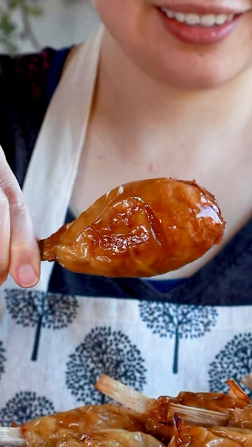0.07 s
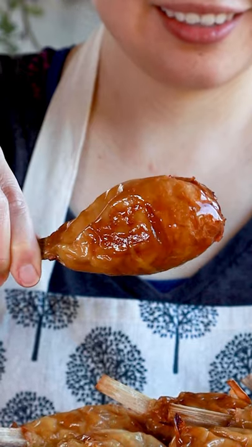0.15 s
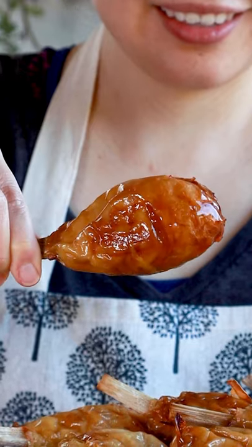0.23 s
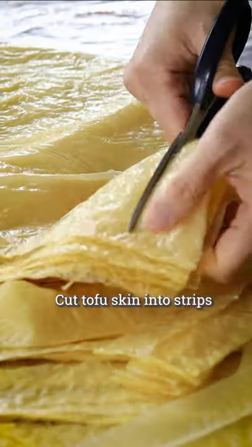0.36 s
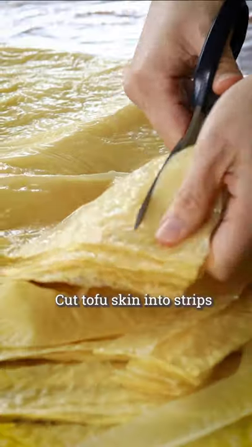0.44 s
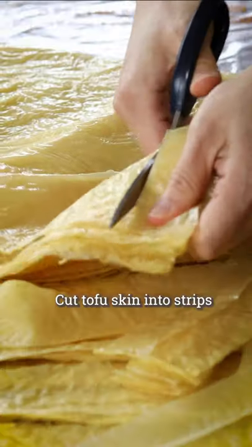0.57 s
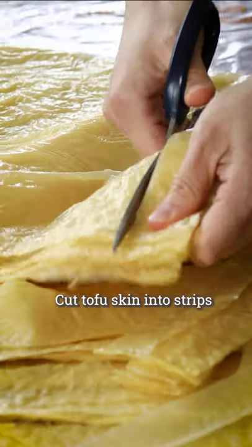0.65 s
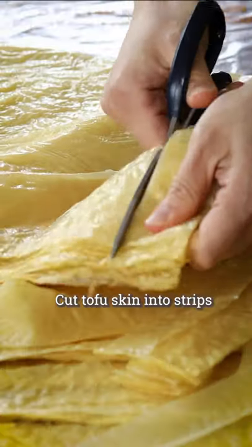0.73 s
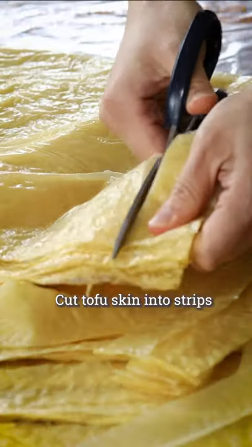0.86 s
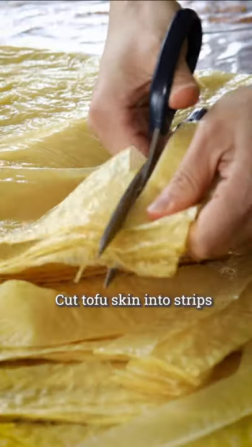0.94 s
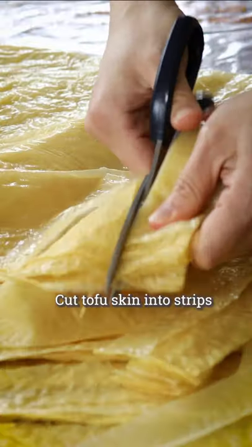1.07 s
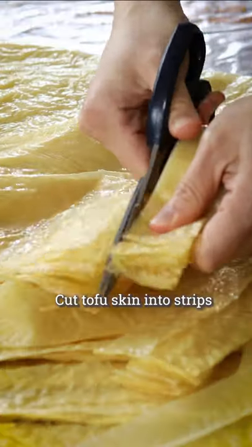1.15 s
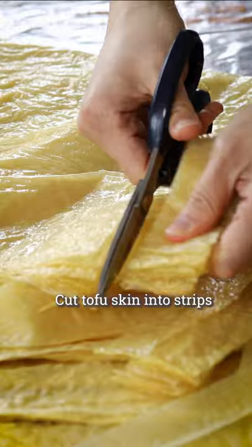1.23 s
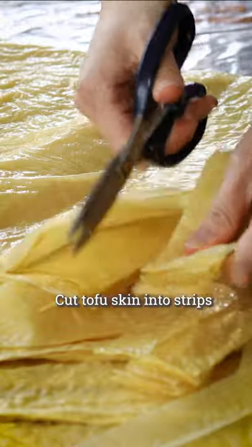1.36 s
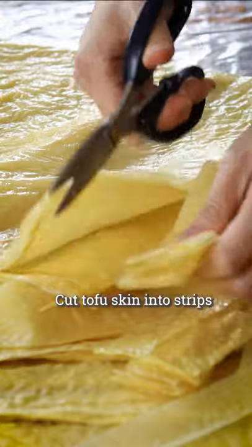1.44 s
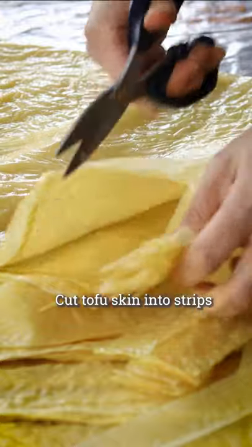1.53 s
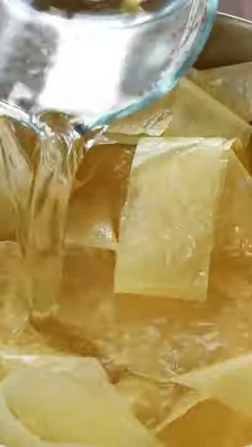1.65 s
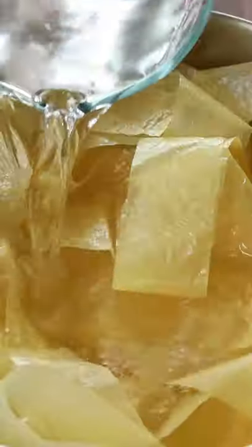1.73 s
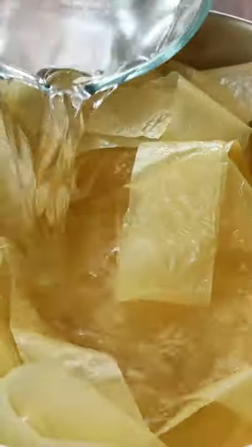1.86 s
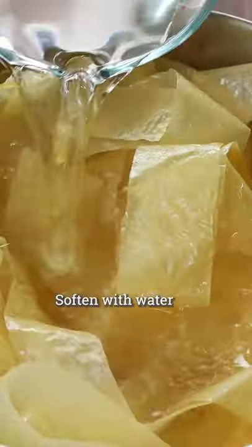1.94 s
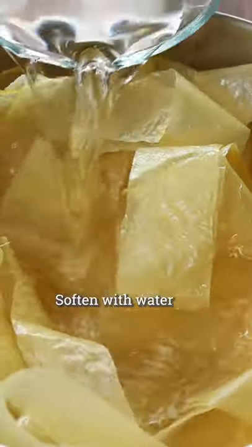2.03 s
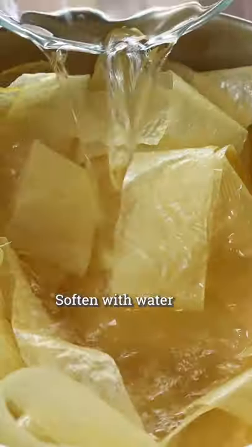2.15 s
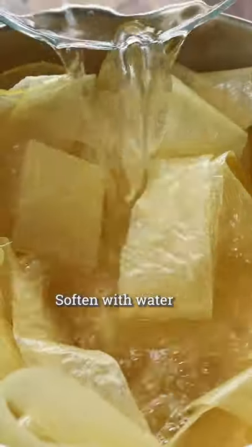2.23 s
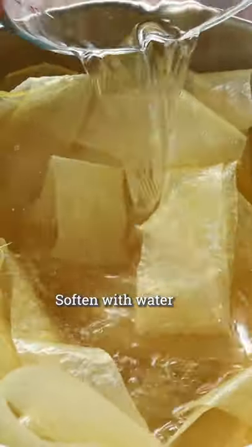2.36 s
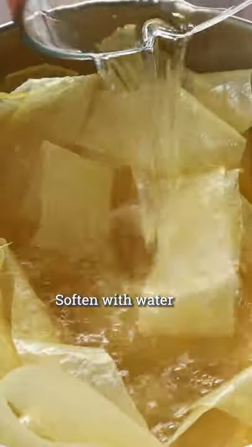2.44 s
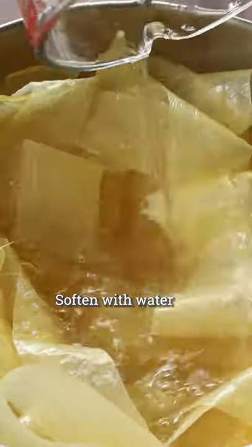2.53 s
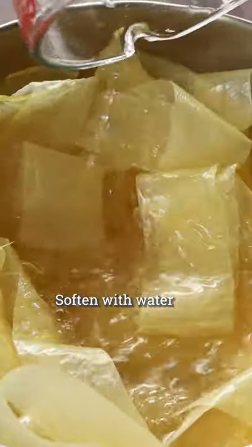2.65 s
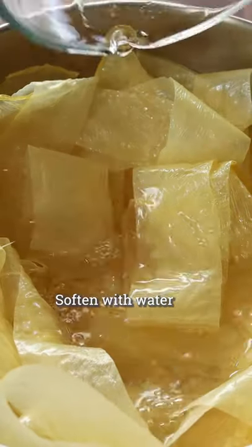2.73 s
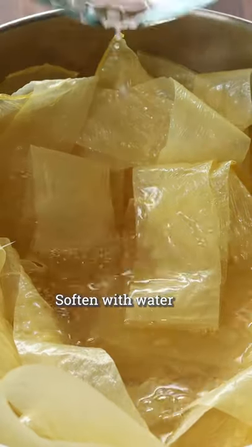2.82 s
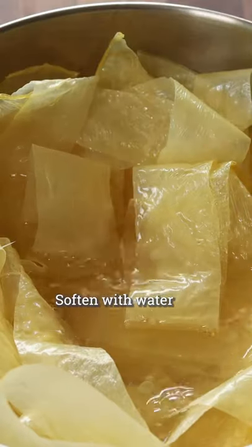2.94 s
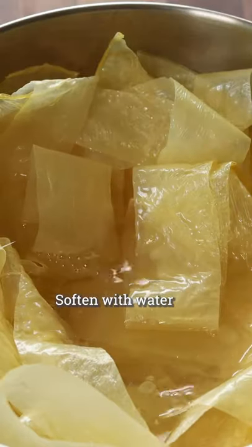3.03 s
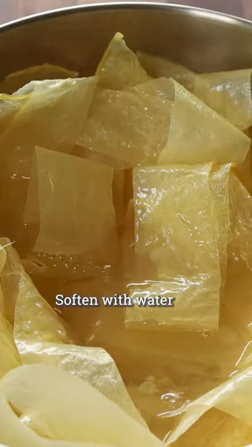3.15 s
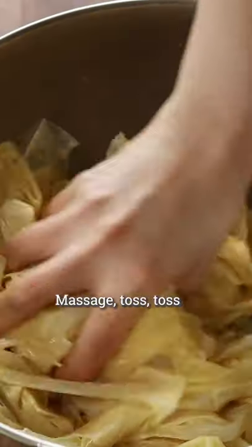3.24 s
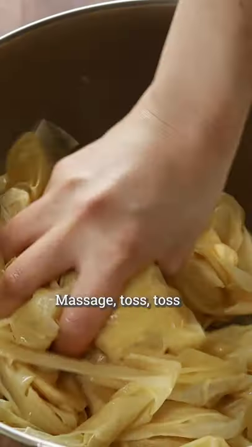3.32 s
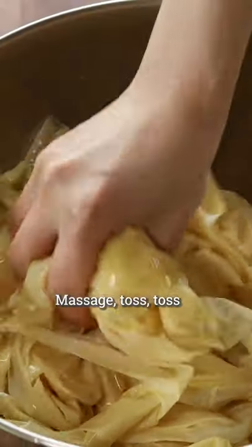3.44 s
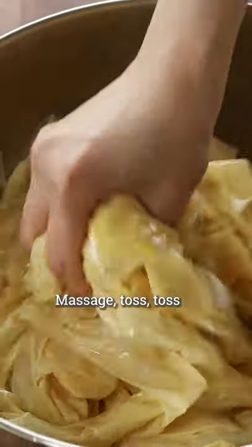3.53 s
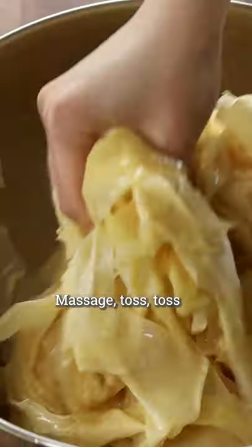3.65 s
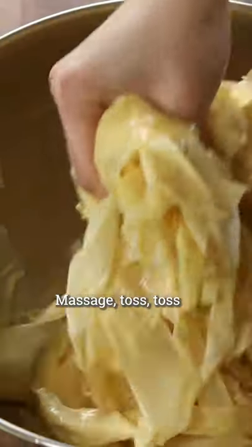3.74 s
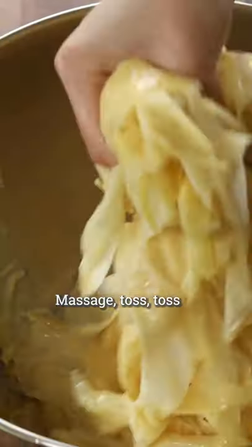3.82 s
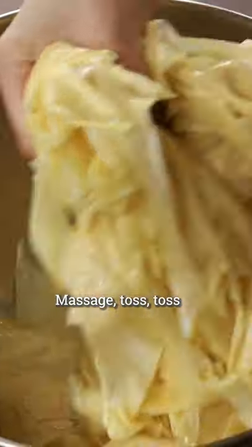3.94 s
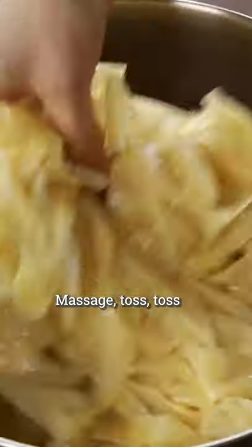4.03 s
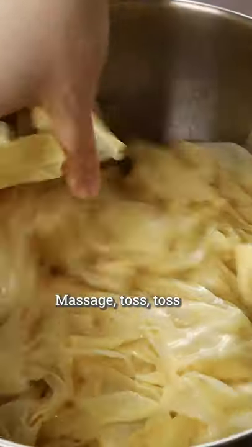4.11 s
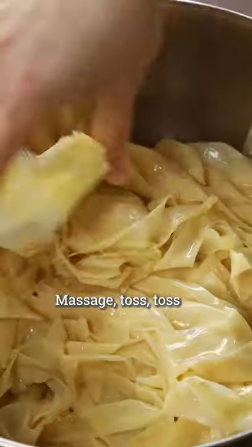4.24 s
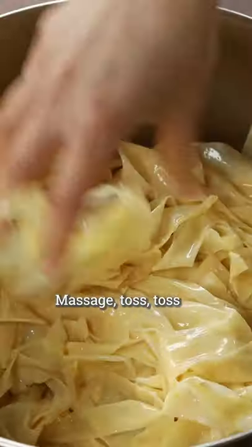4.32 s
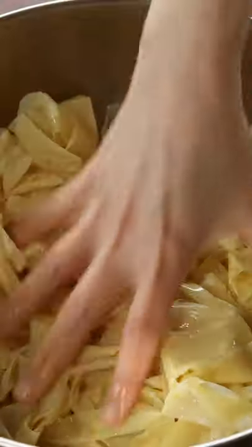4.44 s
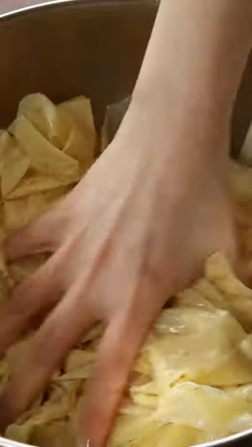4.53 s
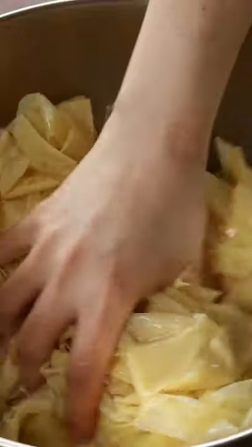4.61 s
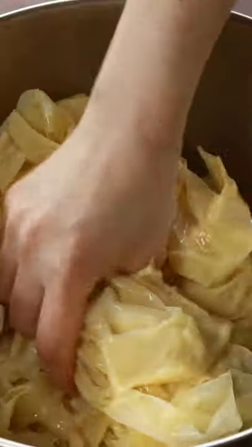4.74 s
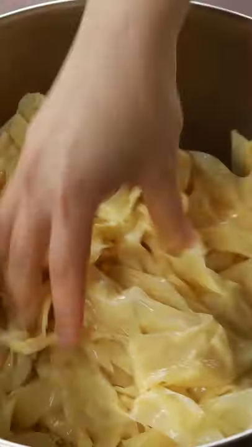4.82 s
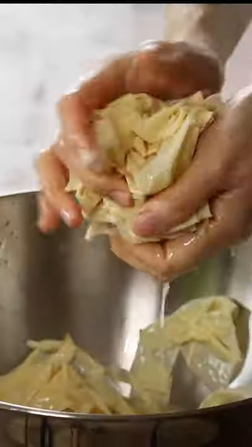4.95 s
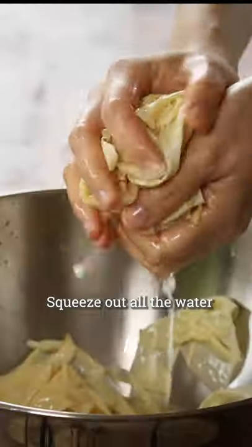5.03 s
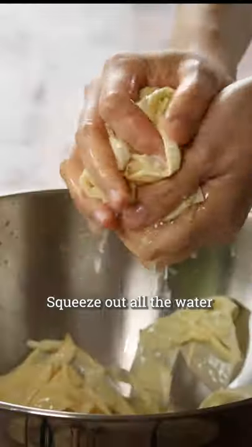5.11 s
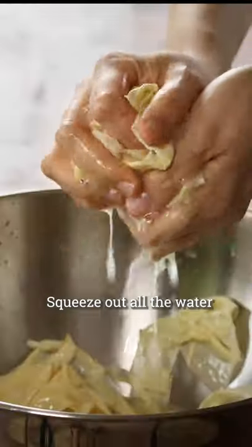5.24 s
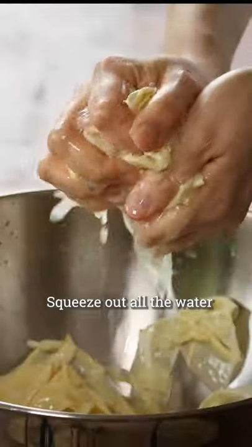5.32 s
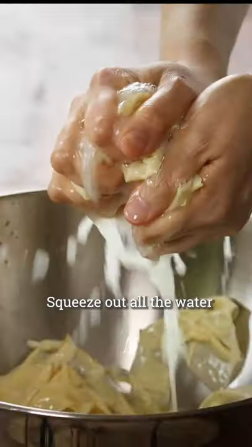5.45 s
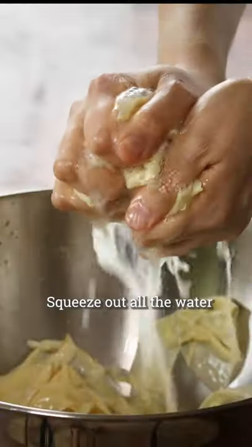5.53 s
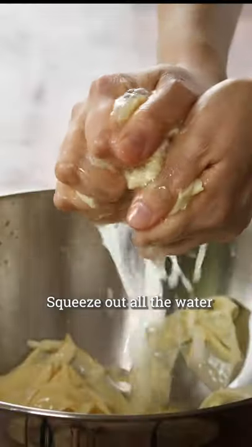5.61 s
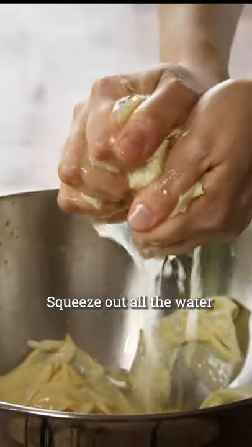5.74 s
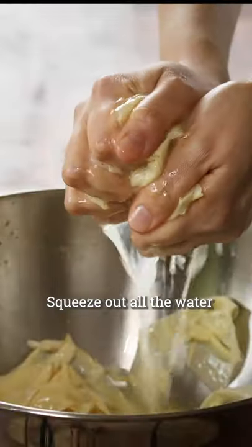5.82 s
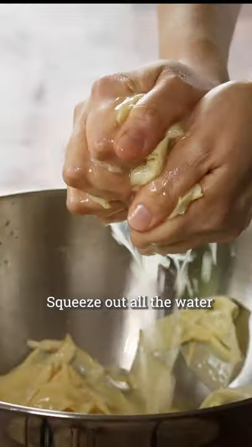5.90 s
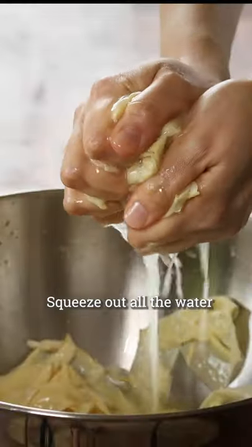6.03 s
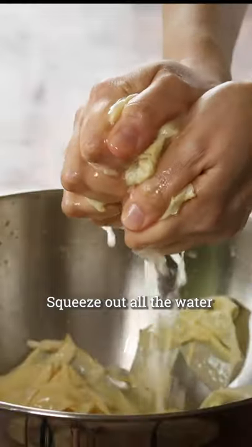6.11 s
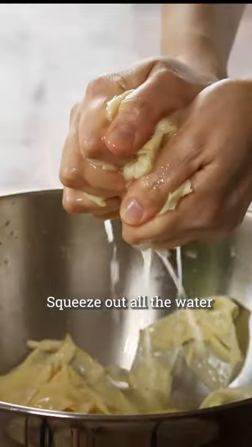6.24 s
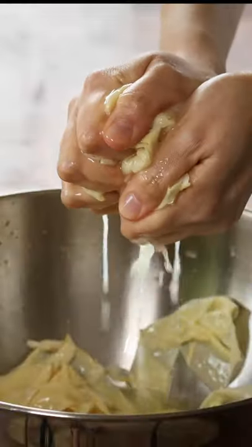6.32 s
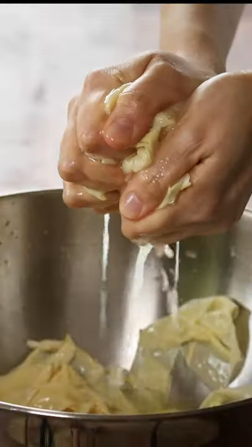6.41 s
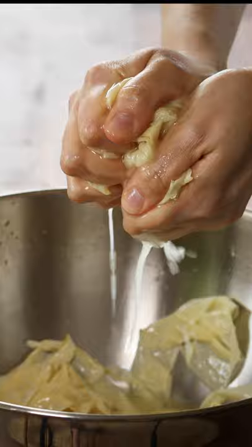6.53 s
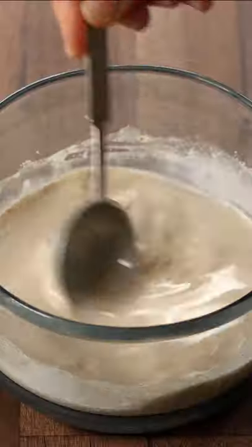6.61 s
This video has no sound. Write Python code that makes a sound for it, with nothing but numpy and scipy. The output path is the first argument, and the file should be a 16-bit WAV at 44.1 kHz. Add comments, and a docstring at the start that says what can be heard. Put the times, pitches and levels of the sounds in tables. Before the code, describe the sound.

Scissors crunch through brittle tofu skin and snap shut, water pours bubbling into a steel bowl, wet strips squelch, then get wrung out in spattering streams.

```python
"""A kitchen in five parts, each with its own background: first low noise, a faint twitter and hiss.
Scissors then crunch through tofu skin (swarms of tiny cracks and ticks) and snap shut (ringing steel).
Water is poured over the strips in a steel bowl (rising sine bubbles over hiss), leaving froth.
A hand tosses the wet strips twice (squelch, squeak and air pops). After a moment of silence two hands
wring them out: water streams, spatters, fizzes and drips. Fan tones hum from the cutting onwards."""
import sys
import numpy as np
from scipy import signal
from scipy.fft import rfft, irfft, next_fast_len
from scipy.io import wavfile

SR = 44100
rng = np.random.default_rng(int(sys.argv[2]) if len(sys.argv) > 2 else 0)


def unload_wav(signal):
    """Save mono or channel-first audio to the path in sys.argv[1] as 16-bit WAV at rate SR, clipped to [-1, 1]."""
    wavfile.write(
        sys.argv[1],
        SR,
        np.round(np.clip(np.atleast_2d(signal).T, -1, 1) * 32767).astype(np.int16),
    )


N = 294147
TIME = np.arange(N) / SR

# background of each part: (start [s], end [s], rumble level [dB], hiss level [dB], low cut [Hz])
PARTS = [(0, 0.385, -59.5, -64, 18), (0.384, 1.717, -50, -55, 46), (1.71, 3.26, -51, -56, 85),
         (3.26, 4.766, -51.5, -52, 75), (4.972, 6.68, -53.5, -53, 86)]
# the blades slam shut, and a close reflection follows about 9 ms later: (time [s], strength [dB])
SNAP_AND_REFLECTION = [(1.2207, 2.5), (1.2297, -10)]


def cutting():
    """Tofu skin cracks at each bite of the blades, which tick as they rub; one more tick follows the snap."""
    # the blades bite into the sheets: (start [s], length [s], level [dB], treble relative to it [dB])
    bites = [(.505, .018, -56.5, 2.5), (.575, .02, -54, -5), (.636, .06, -50.5, -9), (.783, .016, -53, 2.5),
             (.808, 0.01, -48.5, -7.5), (.99, .07, -54, -7), (1.07, 0.0077, -48.5, -12.5),
             (1.176, .042, -45, -1)]
    # colour of the crunch: (frequency [Hz], relative level per Hz [dB])
    shear_colour = [(240, -38.5), (400, 0), (852, -4.5), (1270, -0.5), (1580, -6), (1930, -4), (3580, -13),
                    (12100, -31), (16000, -25.5)]
    # ticks of the blades, the last one well after the snap: (time [s], peak [dB], centre [Hz], width [octaves])
    tick_table = [(0.5094, -32.5, 7000, 2.1), (0.588, -31, 7030, 1.2), (0.63, -33, 2510, 1.6),
                  (0.6744, -35.5, 2390, 1.9), (0.8096, -27.5, 6200, 2.1), (.814, -21, 7560, 1.5),
                  (.983, -38, 3950, 2.3), (1.0718, -28.5, 2200, 0.48), (1.071, -28, 7000, 1.4),
                  (1.0785, -18.5, 2117, 0.56), (1.08, -32, 6500, 1.5), (1.173, -27, 6880, 2.6),
                  (1.185, -30, 7000, 2.7), (1.647, -22.5, 6760, 1.1)]
    span = (PARTS[1][0], SNAP_AND_REFLECTION[0][0])
    body, treble = strokes(bites, attack_s=0.0053, release_db_per_s=172.5)
    crunch = swarm(span, body, treble, shear_colour, count=1400, cycles=11, rise=0,
                   spread_db=0.5, pan_db=4.0, hiss_db=-2)
    ticks = np.zeros((2, N))
    age = np.arange(600) / SR
    for s, db, hz, octaves in tick_table:
        # one click and a short burst of noise
        noise = rng.standard_normal((2, len(age))) * from_db(-60 * age / 0.0078)
        slip = (age == 0) + 0.46 * noise
        half_width = 2 ** (octaves / 2)
        crack = band(slip, [hz / half_width, hz * half_width], "band")
        add(ticks, s, from_db(db) * crack / np.abs(crack).max())
    return kitchen(crunch + ticks, wet_db=-12, early_db=-6.0)


def snap():
    """The closing blades hit their stop: a crack and a brief ring up close, then the room answers."""
    # ringing tones of the scissors: (frequency [Hz], level [dB], time to fall 60 dB [s])
    scissors_modes = [(820, -40, .04), (1430, -23, 0.039), (1963, -16, 0.013), (2170, -14, 0.028),
                      (2700, -20.5, 0.014), (3560, -19, 0.046), (4300, -11.5, 0.0041), (4640, -9.5, 0.012),
                      (5810, -7, 0.0085), (7300, -12, .006), (8830, -5.5, 0.0058), (14360, -13.5, 0.0053)]
    # the snap as it spreads into the room: (frequency [Hz], relative level per Hz [dB])
    snap_colour = [(150, -28.5), (350, -23), (452, -15.5), (754, -6), (990, -15), (1910, 0), (2350, -7.5),
                   (2710, -3.5), (3080, -8.5), (5750, -3), (7670, -11.5), (9000, -7), (11600, -19),
                   (14100, -9), (16000, -35.5)]
    direct = np.zeros((2, N))
    blows = np.zeros((2, N))
    age = np.arange(int(.1 * SR)) / SR
    ring = 0
    for k, (hz, db, t60) in enumerate(scissors_modes):
        sign = (-1) ** k   # neighbouring tones start in opposite directions
        ring = ring + sign * from_db(db - 60 * age / t60) * np.sin(2 * np.pi * hz * age)
    for s, db in SNAP_AND_REFLECTION:
        crack = stereo_noise(-1, size=len(age)) * from_db(-7 - 60 * age / 0.0053)
        add(direct, s, from_db(db) * band(ring + crack, 890, "high"))
        add(blows, s, from_db([db]))
    spreading = coloured(blows, snap_colour)
    reflections = kitchen(spreading, wet_db=-2.5, early_db=0.0) - spreading
    return direct + from_db(15) * reflections


def pouring():
    """The stream drives air into the water: loud bubbles with surges of fizz, middling ones, and slaps."""
    # flow of the pour: (time [s], level [dB])
    pour_flow = [(1.71, -66), (1.726, -43), (1.82, -53), (1.95, -43.5), (2.3, -42), (2.53, -41),
                 (2.65, -46), (2.74, -63), (2.83, -62)]
    # the loudest bubbles, low and high in pitch: (time [s], height [dB], pitch [Hz], ring [cycles])
    loud_table = [(1.7286, -21, 2070, 8.6), (1.7556, -31, 2740, 35), (1.8371, -19, 5770, 14),
                  (1.9606, -23, 2040, 28), (2.0125, -20, 4340, 16), (2.0489, -16.5, 1500, 9.4),
                  (2.1276, -26, 1980, 39), (2.197, -18.5, 3870, 23), (2.2356, -22.5, 5570, 51),
                  (2.2795, -18, 3500, 40), (2.3112, -27, 2160, 36), (2.3885, -14, 3060, 18),
                  (2.423, -21, 8050, 37), (2.4871, -19, 1950, 39), (2.5795, -17.5, 7700, 23),
                  (2.6079, -27, 1590, 56), (2.622, -23, 2840, 33)]
    # the stream slaps onto a floating strip: (start [s], length [s], level [dB], treble relative to it [dB])
    slaps = [(1.75, .015, -43, -4.5), (1.839, 0.057, -50, 7), (2.697, 0.011, -48, 3.5)]
    # colour of the fizz: (frequency [Hz], relative level per Hz [dB])
    pour_colour = [(290, -39), (500, -13), (893, -18), (1180, -8), (1360, -9), (1900, -3.5), (2260, -2.5),
                   (2980, -3.5), (4800, -10), (8090, -17), (10100, -21.5), (14500, -20), (16000, -28)]
    span, flow = flow_curve(pour_flow)
    s, db, hz, cycles = np.transpose(loud_table)
    gulps = from_db(1.67 * drift(34.88))   # the stream gulps unevenly
    # each of the loudest bubbles comes with a surge of fizz
    body = flow * surges(s, db=4, decay_s=0.011) * gulps
    treble = body * from_db(-4 + 2.5 * drift(70))   # the treble flickers
    slap_body, slap_treble = strokes(slaps, attack_s=0.0044, release_db_per_s=352)
    fizz = swarm(span, np.maximum(body, slap_body), np.maximum(treble, slap_treble), pour_colour,
                 count=3400, cycles=34, rise=0.13, spread_db=4.0, pan_db=2.0, hiss_db=-9.5)
    loud = bubbles(s, from_db(db), hz, cycles, rise=0.089, pan_db=6.0, swell_cycles=0.58)
    # bubbles of middling pitch, born at random
    middling = scattered(span, (1555, 4200), count=36, cycles=64, spread_db=2)
    middling = flow * from_db(10.5) * middling
    return kitchen(fizz + loud + middling + froth(), wet_db=-14.5, early_db=-6.0)


def froth():
    """The froth left by the pour crackles and hisses for a moment and fades."""
    span = (2.6, 3.26)   # s
    gain = from_db(-61) * swell(span[0], 0.54, .05, 48)
    hiss = rms_one(band(stereo_noise(3), [4500, 14000], "band")) * during(*span)
    bursts = crackle(span, (5200, 14000), count=700, cycles=15, spread_db=8)
    return gain * (bursts + from_db(-5) * hiss)


def tossing():
    """Wet strips slide, squelch and squeak, then pockets of air pop; the same toss comes twice."""
    # the hand presses, then grips: (start [s], length [s], level [dB], treble relative to it [dB])
    squeezes = [(3.29, 0.1, -48.5, -18), (3.55, 0.017, -50, -16)]
    # colour of the squelch: (frequency [Hz], relative level per Hz [dB])
    toss_colour = [(300, -3.5), (430, -7.5), (560, 3.5), (780, -2), (1050, -1.5), (1600, -6), (2200, -6),
                   (3700, -12), (5000, -16.5), (14000, -25)]
    # pockets of air escaping: (time [s], height before filtering [dB], pitch [Hz], ring [cycles])
    pop_table = [(3.9264, -13, 3630, 13.8), (3.9328, -23.5, 3490, 11), (3.979, -37, 1050, 18),
                 (3.986, -34, 960, 15), (3.994, -38, 1010, 13), (4.005, -38, 890, 14)]
    span, again_s = (3.26, 3.97), .7507
    body, treble = strokes(squeezes, attack_s=0.044, release_db_per_s=37)
    squelch = swarm(span, body, treble, toss_colour, count=1300, cycles=12, rise=0.057,
                    spread_db=5.0, pan_db=1.0, hiss_db=3.5)
    # wet strips part from each other with tiny smacks
    smacks = crackle(span, (9000, 15500), count=160, cycles=14, spread_db=6)
    smacks = body * from_db(-16.5) * smacks
    # air whistles out between the fingers, at a wavering level
    whistle = rms_one(band(stereo_noise(-6), (10600, 11400), "band"))
    squeak = from_db(-67 + 3.4 * drift(90)) * swell(3.62, 0.044, .01, 300) * whistle
    pops = 0
    for s, db, hz, cycles in pop_table:
        pop = bubbles(np.array([s]), from_db([db]), np.array([hz]), cycles, rise=.02, swell_cycles=0.14)
        # a small pocket radiates little bass
        pops = pops + band(band(pop, 0.59 * hz, "high"), 0.61 * hz, "high")
    toss = kitchen(squelch + smacks + squeak + pops, wet_db=-13.5, early_db=-7.0)
    return toss + delayed(toss, again_s)


def wringing():
    """Thin jets spatter on steel and wet strips, brighter as they thin out; single drops fall as well."""
    # flow of the wrung-out water: (time [s], level [dB])
    wring_flow = [(4.972, -78), (5.09, -62), (5.23, -44.5), (5.33, -40.5), (5.53, -39), (5.6, -43.5),
                  (5.95, -47.5), (6.2, -55.5), (6.5, -66), (6.67, -62.5)]
    # drops falling from the hands: (time [s], height [dB], pitch [Hz])
    drop_table = [(5.4178, -19.5, 5700), (5.53, -20.5, 2626), (5.667, -23.5, 4200), (5.8388, -20, 7300),
                  (5.9597, -27.5, 1882), (5.9704, -20.5, 2690), (6.111, -27.5, 2190), (6.2918, -37, 3977),
                  (6.351, -34.5, 6900), (6.5026, -30, 7760), (6.5206, -30, 11210), (6.59, -29, 4270),
                  (6.6084, -34, 4300), (6.6288, -33.5, 1510), (6.635, -33, 980)]
    # colour of the spatter: (frequency [Hz], relative level per Hz [dB])
    wring_colour = [(400, -16), (600, -9.5), (900, -14.5), (1250, -9.5), (1900, -4.5), (2700, -3),
                    (3700, -4.5), (5500, -6), (7500, -7), (10000, -13.5), (16000, -19)]
    thinning_from_s, thinning_db_per_s = 5.19, 11.5
    span, flow = flow_curve(wring_flow)
    treble = from_db(-11.5 + thinning_db_per_s * np.maximum(TIME - thinning_from_s, 0))
    s, db, hz = np.transpose(drop_table)
    body = flow * surges(s, db=1.5, decay_s=0.017)   # each drop throws up some more spatter
    spatter = swarm(span, body, body * treble, wring_colour, count=5400, cycles=23, rise=0.11,
                    spread_db=3.0, pan_db=5.5, hiss_db=-6.5)
    drops = bubbles(s, from_db(db), hz, cycles=24.5, rise=0.12, pan_db=2.0, swell_cycles=0.27)
    return kitchen(spatter + foam(span, count=1300) + drops, wet_db=-13.5, early_db=-2.5)


def foam(span, count):
    """Tiny bubbles burst with very high, long rings, patch by patch."""
    # patches of foam on the wrung-out water: (start [s], length [s], level [dB])
    foam_patches = [(5.41, 0.029, -50), (5.65, 0.013, -47), (6.347, 0.2, -57)]
    start, end = span
    patches = [from_db(db) * swell(s, length, attack_s=0.042, release_db_per_s=94)
               for s, length, db in foam_patches]
    gain = np.max(patches, axis=0)
    when, pitch, luck = rng.random((count, 3)).T
    hz = 10500 + 5000 * pitch
    fizz = bubbles(start + when * (end - start), from_db(15 * luck), hz, cycles=150, rise=.02, pan_db=9)
    return rms_one(fizz) * np.sqrt(during(start, end).mean()) * gain


def twitter():
    """A faint, fluttering narrow band of noise in the first part."""
    tone = rms_one(band(rng.standard_normal(N), [3200, 3750], "band"))
    return tone * during(*PARTS[0][:2]) * from_db(-70.5 + 2 * drift(84))


def background():
    """Fan rumble, wavering fan tones and hiss, different in each part, over the microphones' own hiss."""
    # colour of the rumble: (frequency [Hz], relative level per Hz [dB])
    rumble_colour = [(20, -13.5), (40, 1), (70, 9.5), (135, 4), (195, 6.5), (240, 2), (310, -1), (400, -6),
                     (600, -14.5), (800, -20), (1300, -74.5)]
    # colour of the hiss: (frequency [Hz], relative level per Hz [dB])
    hiss_colour = [(250, 1), (500, 0), (1000, -3.5), (2000, -8.5), (4000, -15), (9000, -20), (16000, -26.5)]
    # fan tones: (start [s], end [s], middle pitch [Hz], middle level [dB])
    fan_tones = [(0.39, 1.709, 361.3, -61), (1.736, 3.254, 147, -55), (1.71, 3.25, 285.8, -60),
                 (3.26, 4.758, 132.5, -55), (3.258, 4.759, 264.4, -58), (4.965, 6.68, 142.4, -61.5),
                 (4.985, 6.68, 287.7, -61)]
    rumble = coloured(stereo_noise(-.5), rumble_colour)
    hiss = rms_one(coloured(stereo_noise(-2.5), hiss_colour))
    out = from_db(-70.5) * rms_one(band(stereo_noise(-14.5), 11000, "low"))   # microphone hiss
    for start, end, rumble_db, hiss_db, cut_hz in PARTS:
        part_rumble = from_db(rumble_db) * rms_one(band(rumble, cut_hz, "high"))
        out = out + during(start, end) * (part_rumble + from_db(hiss_db) * hiss)
    for start, end, hz, db in fan_tones:
        phase = 2 * np.pi * np.cumsum(hz * (1 + 0.01205 * drift(16))) / SR
        level = from_db(db + 1.9 * drift(14))
        out = out + during(start, end) * level * np.sqrt(2) * np.sin(phase)
    return out


def kitchen(x, wet_db, early_db):
    """Close reflections from bowl and worktop, then a diffuse tail that fades at its own rate in each band."""
    # the kitchen's ring: (frequency [Hz], time to fall 60 dB [s])
    room_t60 = [(200, 0.26), (800, 0.67), (2000, 0.58), (5500, 0.69), (9000, 0.3), (15000, 0.78)]
    count = int(.7 * SR)
    age = np.arange(count) / SR
    edges = np.geomspace(150, 19000, 8)
    tail = 0
    for low, high in zip(edges, edges[1:]):
        noise = band(stereo_noise(0, size=count), [low, high], "band")
        tail = tail + noise * from_db(-60 * age / at_hz(room_t60, np.sqrt(low * high)))
    tail = tail + 2 * band(tail, 9000, "low")
    tail = tail * np.clip(age / 0.012, 0, 1) * (age > .004)
    early = band(stereo_noise(0, size=count), [300, 13000], "band")
    early = early * from_db(-60 * age / 0.13) * (age > .0015)
    response = from_db(wet_db) * rms_one(tail) + from_db(early_db) * rms_one(early)
    return x + signal.fftconvolve(x, response / np.sqrt(count), axes=1)[:, :N]


def bubbles(s, size, hz, cycles, rise, pan_db=0, swell_cycles=0.61):
    """Each bubble is a sine that swells quickly, dies over some cycles and rises in pitch near the surface."""
    age = np.arange(1300) / SR
    turns = hz[:, None] * age
    # 1 when the ring has fallen by 60 dB
    spent = np.minimum(turns / np.reshape(cycles, (-1, 1)), 2)
    height = size[:, None] * (1 - np.exp(-(turns / swell_cycles) ** 2)) * from_db(-60 * spent)
    waves = height * np.sin(2 * np.pi * turns * (1 + rise * spent / 2))
    where = np.round((s[:, None] + age) * SR).astype(int).ravel()
    pan = pan_db * rng.standard_normal((len(s), 1))
    sides = [np.bincount(where, (waves * from_db(way * pan / 2)).ravel(), N)[:N] for way in (1, -1)]
    return np.array(sides)


def swarm(span, body_gain, treble_gain, colour, count, cycles, rise, spread_db, pan_db, hiss_db):
    """Many small bubbles or cracks over a fine hiss, with one envelope for the body and one for the treble."""
    start, end = span
    when, pitch, luck, sign = rng.random((count, 4)).T
    # spread evenly in the square root of the pitch, 400 to 15500 Hz
    hz = (np.sqrt(400) + pitch * (np.sqrt(15500) - np.sqrt(400))) ** 2
    size = from_db(spread_db * np.minimum(-np.log(luck), 3.5)) * np.sign(sign - .5)
    smallness = np.sqrt(hz / 3000)   # small bubbles ring for more cycles; the height evens out their energy
    live = during(start, end)
    times = start + when * (end - start)
    grains = bubbles(times, size * smallness, hz, cycles * smallness, rise, pan_db)
    hiss = rms_one(stereo_noise(-5.1) * live)
    sound = coloured(rms_one(grains) + from_db(hiss_db) * hiss, colour)
    body = band(band(sound, 5500, "low"), 5500, "low")
    treble = band(band(sound, 5500, "high"), 5500, "high")
    mix = rms_one(body) * body_gain + rms_one(treble) * treble_gain
    return mix * np.sqrt(live.mean()) * live   # levels count over the span only


def scattered(span, hz_range, count, cycles, spread_db):
    """Single bubbles at random moments, spread evenly in log pitch, of height about 1."""
    when, pitch = rng.random((count, 2)).T
    low, high = hz_range
    size = from_db(spread_db * np.clip(rng.standard_normal(count), -2, 2))
    times = span[0] + when * (span[1] - span[0])
    return bubbles(times, size, low * (high / low) ** pitch, cycles, rise=.1, pan_db=0.5)


def crackle(span, hz_range, count, cycles, spread_db):
    """Scattered tiny bursts, rms about 1 while they last."""
    bursts = scattered(span, hz_range, count=count, cycles=cycles, spread_db=spread_db)
    return rms_one(bursts) * np.sqrt(during(*span).mean())


def flow_curve(points):
    """Start and end of a flow, and its gain at every moment."""
    flow_s, flow_db = np.transpose(points)
    return (flow_s[0], flow_s[-1]), from_db(np.interp(TIME, flow_s, flow_db))


def swell(start, length, attack_s, release_db_per_s):
    """Attack up to the start, hold, then a steady fall in dB."""
    attack = np.clip((TIME - start) / attack_s + 1, 0, 1)
    return attack * from_db(-release_db_per_s * np.maximum(TIME - start - length, 0))


def strokes(rows, attack_s, release_db_per_s):
    """Gains of body and treble for a run of strokes that share one envelope."""
    body = treble = 0
    for start, length, db, treble_db in rows:
        gain = from_db(db) * swell(start, length, attack_s, release_db_per_s)
        body = np.maximum(body, gain)
        treble = np.maximum(treble, gain * from_db(treble_db))
    return body, treble


def surges(times, db, decay_s):
    """A gain that rises quickly by db at each of the times and relaxes back to 1."""
    release = 20 / np.log(10) / decay_s   # dB per second
    return from_db(db * np.max([swell(t, 0, 0.0027, release) for t in times], axis=0))


def from_db(db):
    """Decibels to gain."""
    return 10 ** (np.asarray(db) / 20)


def rms_one(x):
    """Scale to rms 1."""
    return x / np.sqrt(np.mean(x ** 2) + 1e-20)


def at_hz(points, hz):
    """Read a table on a log-frequency axis."""
    f, value = np.transpose(points)
    return np.interp(np.log(np.maximum(hz, 1)), np.log(f), value)


def during(start, end):
    """1 between two moments, with 2 ms fades just inside them."""
    return np.clip(np.minimum(TIME - start, end - TIME) / .002, 0, 1)


def coloured(x, spectrum):
    """Give a sound a smooth spectrum that falls away below its first point."""
    size = next_fast_len(N + 4096)
    hz = np.fft.rfftfreq(size, 1 / SR)
    gain = from_db(at_hz(spectrum, hz)) * np.minimum(hz / spectrum[0][0], 1) ** 2
    return irfft(rfft(x, size) * gain, size)[..., :N]


def band(x, hz, kind):
    """Butterworth filter, second order at each edge."""
    sos = signal.butter(2, np.minimum(hz, .45 * SR), kind, fs=SR, output="sos")
    return signal.sosfilt(sos, x + 1e-18)


def drift(rate):
    """Random wandering of rms 1, with rate new values a second joined by straight lines."""
    knots = rng.standard_normal(4000)
    return rms_one(np.interp(TIME * rate, np.arange(len(knots)), knots))


def stereo_noise(side_db, size=N):
    """Noise at two close microphones: they hear the bass nearly alike and the treble differently."""
    mid, side = rng.standard_normal((2, size))
    high_pass = signal.butter(1, 1200, "high", fs=SR)
    side = 0.06 * side + 0.85 * signal.lfilter(*high_pass, side)
    return mid + from_db(side_db) * side * [[1], [-1]]


def add(out, s, sound):
    """Mix a short sound in at time s."""
    at = max(round(s * SR), 0)
    out[..., at:at + sound.shape[-1]] += sound[..., :max(N - at, 0)]


def delayed(x, s):
    """The same sound, s seconds later."""
    return np.pad(x, [(0, 0), (round(s * SR), 0)])[:, :N]


def scene():
    """All sources, silent between the last two parts."""
    heard = 1 - during(PARTS[-2][1], PARTS[-1][0])
    work = cutting() + snap() + pouring() + tossing() + wringing()
    right_db = 0.7   # the work lies a little to the right of the microphones
    placed = work * from_db([[-right_db / 2], [right_db / 2]])
    return heard * (placed + twitter() + background())


def record(dry):
    """Clip any peak beyond full scale, then cut the top above 16 kHz."""
    low_pass = signal.ellip(10, .2, 90, 16000, fs=SR, output="sos")
    return signal.sosfilt(low_pass, np.clip(dry, -1, 1))


dry = scene()
out = record(dry)
unload_wav(out)
```